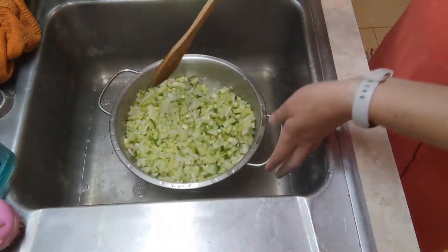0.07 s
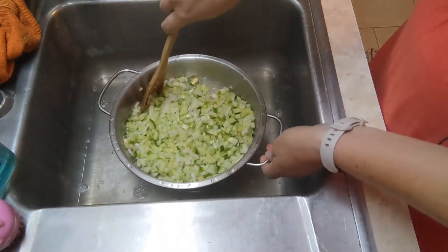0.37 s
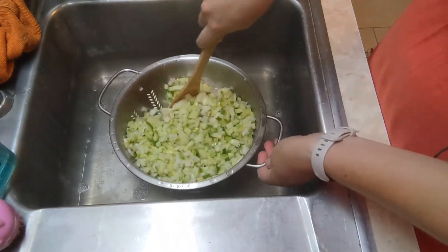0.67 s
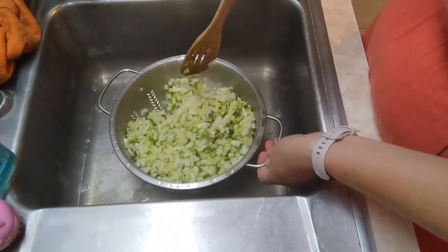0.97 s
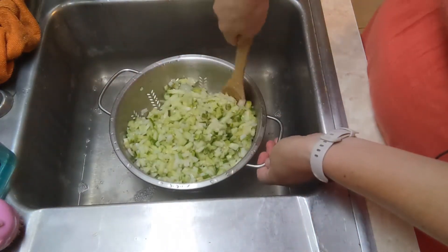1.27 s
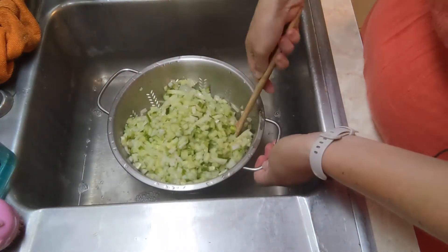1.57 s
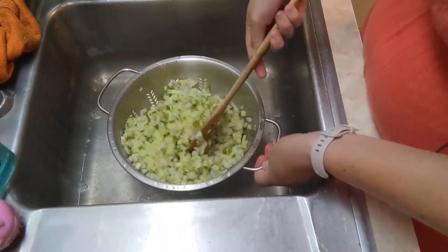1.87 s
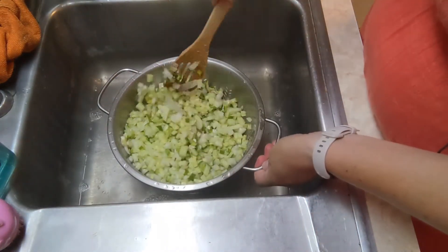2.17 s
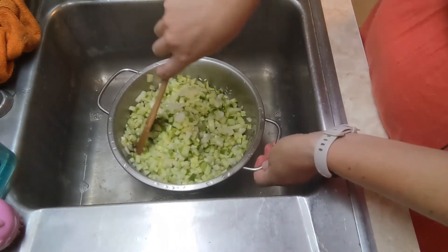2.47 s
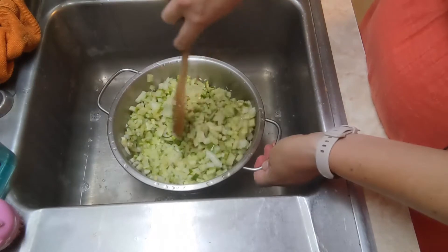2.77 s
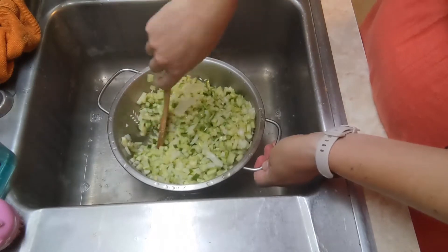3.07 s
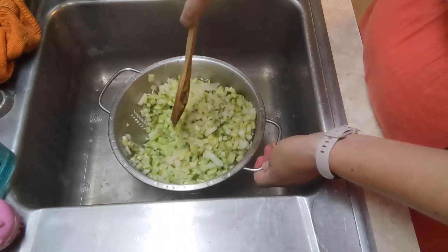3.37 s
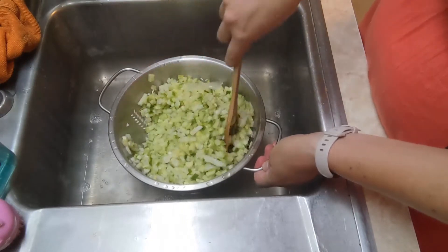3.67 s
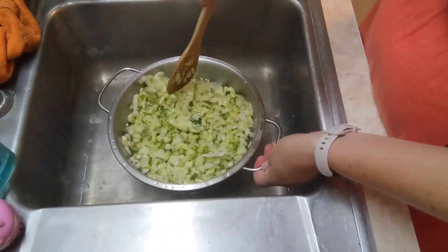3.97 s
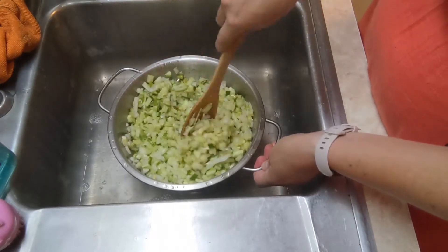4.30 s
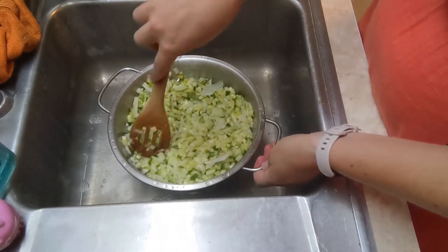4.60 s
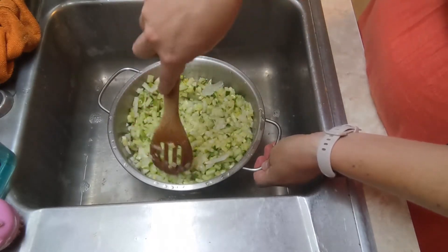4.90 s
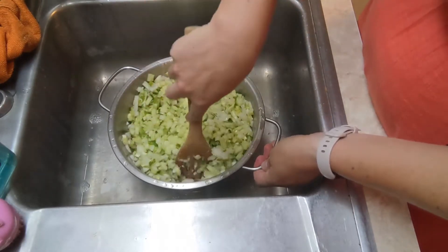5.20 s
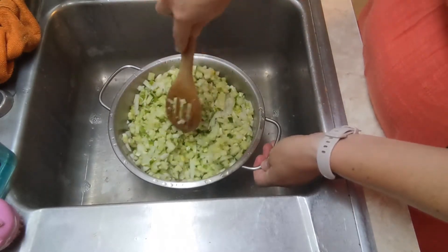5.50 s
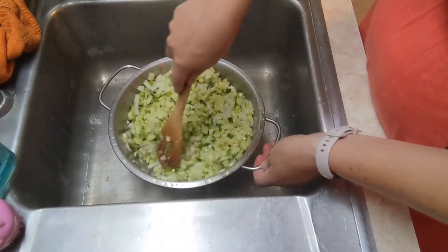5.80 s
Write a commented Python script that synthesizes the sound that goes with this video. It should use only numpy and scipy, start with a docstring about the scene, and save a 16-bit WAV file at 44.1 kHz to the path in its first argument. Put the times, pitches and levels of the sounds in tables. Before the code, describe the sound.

A wooden spoon stirs wet chopped vegetables in a steel colander set in a sink, heard close in a quiet kitchen. During the first second, soft bumps and a low rumble come from a hand on the microphone, and at 0.3 seconds the spoon lands with a light, ringing clack. Stirring picks up at 1 second, with sharp clacks and scrapes on the metal wall from 1.1 to 1.5 seconds. Strokes follow roughly every half second: dull knocks and thuds through the food, a tumbling rustle and tiny wet squelches, with colander and sink ringing briefly together. A clump flops over with a small plop at 2 seconds. A bright clack comes at 3.5 seconds, and a quick cluster with a rim clink at 4.3. After 5 seconds the stirring gets lighter, with faint taps, scrapes and one soft microphone bump, fading by about 6 seconds.

```python
"""Clacks, scrapes and dull knocks: a wooden spoon stirs wet chopped vegetables in a steel colander.
The spoon strikes the bare wall or pushes through the food to the floor of the steel sink below;
colander and sink ring together. The food tumbles, rustles and squelches as wet faces part.
Soft bumps and a low rumble come from the hand on the microphone, in a quiet kitchen."""
import sys
import numpy as np
from scipy import signal
from scipy.fft import rfft, irfft, next_fast_len
from scipy.io import wavfile
from scipy.ndimage import uniform_filter1d

SR = 44100
rng = np.random.default_rng(int(sys.argv[2]) if len(sys.argv) > 2 else 0)


def dump_mix(stems):
    """Bounce the given channels to the path in sys.argv[1] as a 16-bit WAV at rate SR."""
    frames = np.atleast_2d(stems).T  # one column per channel
    limited = np.clip(frames, -1, 1)  # hard clip at full scale
    pcm = np.round(limited * 32767).astype(np.int16)
    wavfile.write(sys.argv[1], SR, pcm)


N = 266760
TIME_S = np.arange(N) / SR
BLOW_S = TIME_S[:8192]

# Table levels are relative; each source adds its own trim.
# spoon on bare metal: start_s, level_db, spot_hz, spread_oct, body_db
WALL_CLACKS = [(0.2891, -51.5, 2420, 2.7, -49.5), (0.3233, -43.5, 7900, 0.18, -57.5),
               (0.361, -58, 3950, 0.23, -80), (0.524, -65, 7000, 0.49, -88),
               (0.596, -61.5, 11000, 0.39, -92), (0.641, -61.5, 3050, 0.29, -69),
               (1.1395, -36, 2750, 0.87, -44), (1.2121, -48, 12000, 0.86, -69),
               (1.2718, -45, 7600, 2.1, -66), (1.2823, -43, 3400, 1.16, -61.5),
               (1.501, -40, 5660, 0.42, -65), (1.503, -49.5, 9500, 0.48, -56.5),
               (3.488, -42.5, 8000, 2.4, -74), (3.4911, -43, 2220, 0.45, -74),
               (4.129, -50, 9300, 0.26, -65), (4.3429, -42, 4270, 0.58, -76),
               (4.351, -42.5, 3470, 0.54, -72), (4.374, -49, 3000, 0.56, -65.5),
               (4.839, -56.5, 8900, 0.41, -86), (5.1245, -59, 1960, 0.27, -55.5),
               (5.149, -59.5, 7500, 0.57, -74), (5.502, -60.5, 2780, 1.1, -66.5)]
# firm pushes through the food: start_s, knock_db, thud_db
FOOD_KNOCKS = [(0.999, -54.5, -49.5), (1.142, -50, -57), (1.312, -49.5, -48), (1.603, -67, -52),
               (1.679, -57.5, -63), (1.856, -57, -57), (1.962, -46, -46), (1.996, -50, -74),
               (2.243, -53.5, -42), (2.477, -52, -46), (2.611, -51.5, -43.5), (2.789, -45, -50),
               (2.875, -51.5, -68), (2.915, -56.5, -45), (2.943, -51.5, -50), (3.04, -61, -58),
               (3.204, -59.5, -48.5), (3.4439, -49, -47), (3.688, -52, -70), (3.841, -56.5, -53),
               (3.918, -52.5, -49.5), (4.1607, -59, -58), (4.272, -56.5, -56), (4.373, -51, -47),
               (4.4196, -50, -47), (4.517, -55, -51), (4.735, -54, -52.5), (4.776, -62, -50.5),
               (4.879, -54.5, -59), (4.966, -55, -71), (5.6459, -57.5, -75)]
# strokes through the food: start_s, length_s, effort_db, wet_db
SPOON_STROKES = [(0.474, 0.25, -13, -75.5), (0.947, 0.11, -0.5, -79), (1.26, 0.32, 4, -73),
                 (1.842, 0.31, 2.5, -73.5), (2.384, 0.37, -1.5, -75), (2.967, 0.46, -0.5, -73.5),
                 (3.662, 0.33, 0, -74.5), (4.182, 0.33, -1.5, -74.5), (4.712, 0.23, -1, -74),
                 (5.101, 0.092, 0.5, -70), (5.604, 0.22, -9, -77)]
# juice pockets parting: pitch_hz, scatter_oct, rate_per_s, level_db
JUICE_POCKETS = [(8850, 0.08, 38, -3), (4350, 0.3, 6, -5)]
# wood and food on the perforated wall: middle_s, width_s, hiss_db, rasp_db
WALL_SLIDES = [(0.337, 0.028, -60.5, -58), (0.463, 0.16, -65, -68), (1.207, 0.04, -50.5, -51),
               (1.282, 0.032, -55.5, -49.5), (1.344, 0.018, -65, -47), (2.062, 0.042, -69.5, -50.5),
               (2.43, 0.014, -67.5, -60.5), (2.497, 0.028, -69.5, -64.5), (3.07, 0.07, -74, -73),
               (4.191, 0.029, -64, -55.5), (5.149, 0.057, -65.5, -69), (5.808, 0.056, -71, -84)]
# a clump flops over: start_s, level_db, pitch_hz
CLUMP_PLOPS = [(2.042, -45, 750)]
# spoon catches the rim: start_s, level_db
RIM_CLINKS = [(1.1405, -56), (3.4895, -55), (4.3455, -43.5), (5.503, -65)]
# bumps on the microphone case: start_s, bump_db, boom_db, lowpass_hz
CASE_BUMPS = [(0.077, -42.5, -29, 600), (0.4742, -37, -40, 1510), (0.548, -40.5, -41.5, 850),
              (0.641, -50, -38.5, 300), (0.84, -46.5, -39, 346), (0.944, -51.5, -50, 414),
              (5.684, -48, -77, 1010)]
# hand sways: middle_s, width_s, sway_db, rumble_db
HAND_SWAYS = [(0.11, 0.29, -32, -30.5), (0.702, 0.054, -38, -33.5), (1.196, 0.48, -31, -45.5),
              (5.203, 0.078, -46.5, -49)]

# modes: pitch_hz, gain_db, t60_s
STEEL_RING = [(191.6, 4.5, 0.1), (475.5, 12, 0.38), (671.3, 11.5, 0.14), (843, 8.5, 0.14),
              (944, -0.5, 0.22), (1135, 13.5, 0.18), (1230, -0.5, 0.1), (1331, 0.5, 0.1), (1455, 0, 0.19),
              (1724, 8.5, 0.17), (1826, 8.5, 0.19), (2019, 5.5, 0.1), (2710, 1.5, 0.067), (3140, 0.5, 0.09),
              (4100, 4, 0.081)]  # colander and sink together
RIM_RING = [(1746, -10, 0.14), (2400, -5.5, 0.13), (3050, 4, 0.13), (3050, -36, 0.038), (3300, -17, 0.1),
            (3950, 1, 0.033), (4860, -0.5, 0.027), (5640, -32, 0.063), (6600, -18, 0.056)]
LANDING_RING = [(202.4, 5.5, 0.26), (417, 1, 0.15), (1006, -10, 0.15), (1184, -18, 0.6), (1215, -2, 0.13),
                (2066, -0.5, 0.082), (2143, -2.5, 0.12)]  # bowl's lowest note, spoon's bending modes

# spectra: freq_hz, gain_db
WOOD_ROLLOFF = [(9600, -0.5), (11200, -7), (15500, -30)]  # wood is too soft to excite the very top
KNOCK_SPECTRUM = [(150, -2.5), (400, -8.5), (750, 1), (1200, 9), (1530, 8.5), (1800, -12), (3000, -28),
                  (12000, -61.5)]
THUD_SPECTRUM = [(50, -27.5), (110, -9), (150, 1.5), (200, -6.5), (300, -14.5), (600, -19.5), (12000, -100)]
SQUEEZE_SPECTRUM = [(2500, -12), (4500, 11), (7000, -2), (9200, 7), (10500, -23), (15500, -25)]
TUMBLE_SPECTRUM = [(60, -16), (130, 5.5), (190, 4.5), (290, -11), (560, -11), (800, -8.5), (1200, -6.5),
                   (1520, -9.5), (1750, -26.5), (3000, -21.5), (12000, -51.5)]
FIZZ_SPECTRUM = [(1200, -22.5), (2200, 2.5), (3200, -6.5), (5500, -5.5), (7500, -9.5), (9200, -6.5),
                 (10500, -67), (12000, -12), (15500, -50)]
HISS_SPECTRUM = [(2500, -2.5), (4500, 2), (6000, 5), (9300, 7), (10500, -2.5), (12000, -8), (15500, -32)]
RASP_SPECTRUM = [(120, 16), (300, 3), (600, -2), (1800, 0), (2600, 3), (4100, -10), (5500, 0.5),
                 (11000, -51)]
BUMP_SPECTRUM = [(50, -30.5), (110, 12), (350, 2.5), (560, -0.5), (800, -2), (1300, -18.5), (4000, -29),
                 (12000, -73)]
SWAY_SPECTRUM = [(2.5, -6), (5, 3), (12, -15), (25, -43.5), (60, -92)]
RUMBLE_SPECTRUM = [(6, 7), (14, 12.5), (25, -3), (50, -13.5), (90, -25.5), (250, -51), (600, -70.5)]
AIR_SPECTRUM = [(35, -20.5), (60, 3), (98, -5.5), (351, -17.5), (1020, -24), (1150, -19), (1590, -25.5),
                (3340, -34.5), (8870, -40), (15500, -48.5)]


def clacks(t60_s=0.07, treble_damping=0.15, body_top_hz=1800, spot_db=6, spot_t60_s=0.0024, trim_db=-4):
    """Hard blows, strongest near the struck spot's pitch, over the bowl's low body. Highs die first."""
    out = np.zeros(N)
    edges_hz = [150, 600, body_top_hz, 5000, 7400, 10000, 15000]
    for start_s, level_db, spot_hz, spread_oct, body_db in WALL_CLACKS:
        spot_gain = from_db(spot_db) * np.exp(-spread_oct ** 2)
        for low_hz, high_hz in zip(edges_hz, edges_hz[1:]):
            offset_oct = np.log2(np.sqrt(low_hz * high_hz) / spot_hz)
            band_gain = from_db(level_db) * np.exp(-.5 * (offset_oct / spread_oct) ** 2)
            body_gain = from_db(body_db) * (high_hz <= body_top_hz)
            contact = burst(t60_s * (body_top_hz / low_hz) ** treble_damping, snap=7)
            contact += spot_gain * resonate(contact, spot_hz, spot_t60_s)
            bandpass = signal.butter(3, [low_hz, high_hz], "band", fs=SR, output="sos")
            band = at_level(signal.sosfilt(bandpass, contact), trim_db)
            add(out, start_s, np.hypot(band_gain, body_gain) * band)
    return colour(out, WOOD_ROLLOFF)


def knocks(effort, rise_s=0.002, give=1.4, spot_spread_db=4):
    """Cushioned blows, each coloured by its spot; the sink floor thuds and juice squeezes out."""
    out = np.zeros(N)
    for start_s, knock_db, thud_db in FOOD_KNOCKS + nudges(effort):
        spot_colour = np.outer(rng.standard_normal(len(KNOCK_SPECTRUM)), [0, spot_spread_db])
        knock = colour(push(0.034, rise_s, give), np.array(KNOCK_SPECTRUM) + spot_colour)
        thud = colour(push(0.08, rise_s, give), THUD_SPECTRUM)
        squeeze = colour(burst(t60_s=0.056), SQUEEZE_SPECTRUM)
        add(out, start_s, at_level(knock, knock_db - 2))
        add(out, start_s, at_level(thud, thud_db - 5))
        add(out, start_s, at_level(squeeze, knock_db - 21))
    return out


def nudges(effort, rate_per_s=14, spread_db=2, knock_db=-59, thud_db=-60):
    """Light knocks at loose intervals, scaled by the effort; rows as in FOOD_KNOCKS."""
    jitter = rng.standard_normal((120, 3))
    starts_s = (np.arange(len(jitter)) + .5 * jitter[:, 0]) / rate_per_s
    effort_db = 20 * np.log10(np.interp(starts_s, TIME_S, effort))
    levels_db = effort_db[:, None] + spread_db * jitter[:, 1:] + [knock_db, thud_db]
    return [row for row in np.column_stack([starts_s, levels_db]) if 0 < row[0] < TIME_S[-1]]


def strokes(dig_s=0.027, settle_s=0.3):
    """Effort and wet-rustle gains: the spoon digs in, holds and lifts; the food settles."""
    effort, wet = np.full((2, N), 1e-6)
    for start_s, length_s, effort_db, wet_db in SPOON_STROKES:
        dig = np.clip((TIME_S - start_s) / dig_s, 0, 1)
        settle = np.exp(-np.maximum(TIME_S - start_s - length_s, 0) / settle_s)
        effort = np.maximum(effort, from_db(effort_db) * dig * settle)
        wet = np.maximum(wet, from_db(wet_db) * dig * settle)
    return effort, wet


def stirring(effort, wet, tumble_db=-66, fizz_db=-2, squelch_db=-4.5):
    """Pieces tumble against the bowl; wet faces part with a fizz and small high squelches."""
    tumble = grains(TUMBLE_SPECTRUM, rate_per_s=920, spread_db=2.5, clump_db=5, clumps_per_s=49)
    fizz = grains(FIZZ_SPECTRUM, rate_per_s=4000, spread_db=3, clump_db=4.5, clumps_per_s=30)
    rustle = from_db(fizz_db) * fizz + from_db(squelch_db) * squelches()
    return from_db(tumble_db) * effort * tumble + wet * rustle


def squelches(rise_s=0.005, pocket_t60_s=0.0014, spread_db=3):
    """Each pocket of juice parts with a short soft crackle at its own pitch."""
    out = np.zeros(N)
    for centre_hz, scatter_oct, rate_per_s, level_db in JUICE_POCKETS:
        jitter = np.clip(rng.standard_normal((400, 3)), -2, 2)
        for k, (late, detune, size) in enumerate(jitter):
            start_s = (k + late) / rate_per_s
            pitch_hz = centre_hz * 2 ** (scatter_oct * detune)
            if 0 < start_s < TIME_S[-1]:
                crackle = burst(t60_s=0.06) * np.minimum(BLOW_S / rise_s, 1)
                for _ in range(2):
                    crackle = resonate(crackle, pitch_hz, pocket_t60_s)
                add(out, start_s, from_db(level_db + spread_db * size) * crackle)
    return rms_one(out)


def slides():
    """Each slide swells and fades: wet food hisses on the steel, wood ticks over the holes."""
    hiss = grains(HISS_SPECTRUM, rate_per_s=4500, spread_db=2.3, clump_db=2.8, clumps_per_s=160)
    rasp = grains(RASP_SPECTRUM, rate_per_s=2600, spread_db=3, clump_db=6, clumps_per_s=88)
    out = np.zeros(N)
    for middle_s, width_s, hiss_db, rasp_db in WALL_SLIDES:
        out += swell(middle_s, width_s) * (from_db(hiss_db + 1) * hiss + from_db(rasp_db - 3) * rasp)
    return out


def plops():
    """A falling clump closes a pocket of air, which rings briefly."""
    out = np.zeros(N)
    for start_s, level_db, pitch_hz in CLUMP_PLOPS:
        pocket = resonate(burst(t60_s=0.035), pitch_hz, t60_s=0.012)
        add(out, start_s, at_level(pocket, level_db - 3.5))
    return out


def steel(contacts, trim_db=3, split=0.011, moves_per_s=7):
    """Contacts ring colander and sink. Each mode is a close pair; the spot touched picks which speaks."""
    out = np.zeros(N)
    for pitch_hz, gain_db, t60_s in STEEL_RING:
        spot_rad = np.pi * wander(moves_per_s)
        lower = resonate(contacts * np.cos(spot_rad), pitch_hz * (1 - split), t60_s)
        upper = resonate(contacts * np.sin(spot_rad), pitch_hz * (1 + split), t60_s)
        out += from_db(gain_db + trim_db) * (lower + upper)
    return out


def struck(strikes, modes):
    """Free ringing after clean strikes, given as start_s, level_db."""
    out, t = np.zeros(N), TIME_S[:SR]
    ring = sum(np.sin(2 * np.pi * hz * t) * from_db(db - 60 * t / t60_s) for hz, db, t60_s in modes)
    for start_s, level_db in strikes:
        add(out, start_s, from_db(level_db) * ring)
    return out


def hand_rumble(steady_sway_db=-52, steady_rumble_db=-55.5):
    """The hand sways the microphone; rumble reaches it through the case."""
    sway, rumble = from_db(steady_sway_db), from_db(steady_rumble_db)
    for middle_s, width_s, sway_db, rumble_db in HAND_SWAYS:
        movement = swell(middle_s, width_s)
        sway = sway + from_db(sway_db) * movement
        rumble = rumble + from_db(rumble_db) * movement
    return sway * noise(SWAY_SPECTRUM) + rumble * noise(RUMBLE_SPECTRUM)


def case_bumps(case_hz=540, case_t60_s=0.047, boom_hz=48, boom_t60_s=0.11):
    """Soft bumps ring the microphone's case briefly, over a low boom."""
    out = np.zeros(N)
    boom = np.sin(2 * np.pi * boom_hz * BLOW_S) * BLOW_S * from_db(-60 * BLOW_S / boom_t60_s)
    for start_s, bump_db, boom_db, lowpass_hz in CASE_BUMPS:
        bump = colour(push(t60_s=0.82, rise_s=0.003025), BUMP_SPECTRUM)
        bump = signal.sosfilt(signal.butter(2, lowpass_hz, fs=SR, output="sos"), bump)
        add(out, start_s, at_level(bump + resonate(bump, case_hz, case_t60_s), bump_db - 3))
        add(out, start_s, at_level(boom, boom_db - 2))
    return out


def kitchen(x, t60_s=0.45, delay_s=0.0057):
    """A dense tail from the hard walls, duller than the direct sound."""
    t = TIME_S[:SR]
    tail = rng.standard_normal(SR) * from_db(-60 * t / t60_s) * (t > delay_s)
    tail = colour(tail / np.linalg.norm(tail), [(150, 2.5), (1000, 3.05), (5000, 1.06), (12000, 0.29)])
    return signal.fftconvolve(x, tail)[:N]


def burst(t60_s, snap=0):
    """A contact: a first click of size snap, then dying micro-impacts."""
    x = rng.standard_normal(len(BLOW_S)) * from_db(-60 * BLOW_S / t60_s)
    x[0] += snap
    return x


def push(t60_s, rise_s, give=0, slips=30):
    """A cushioned contact: a first break scaled by give, then a quick run of small slips."""
    x = np.zeros(len(BLOW_S))
    slip_s = rng.gamma(2, rise_s, slips)
    np.add.at(x, np.minimum(slip_s * SR, len(x) - 1).astype(int), rng.standard_normal(slips))
    x[0] += give * np.sqrt(slips)
    return x + burst(t60_s) * np.sqrt(slips / (t60_s * SR))


def grains(spectrum, rate_per_s, spread_db, clump_db, clumps_per_s):
    """Tiny uneven contacts that come in clumps; coloured, rms 1."""
    sizes = from_db(spread_db * np.minimum(rng.exponential(1, N), 5)) * rng.choice([-1, 1], N)
    clumps = from_db(clump_db * np.clip(wander(clumps_per_s), -2, 2))
    hits = rng.random(N) < rate_per_s / SR
    return rms_one(colour(sizes * hits * clumps, spectrum))


def noise(spectrum):
    """Coloured noise, rms 1."""
    return rms_one(colour(rng.standard_normal(N), spectrum))


def wander(rate_per_s):
    """Random drift."""
    return np.interp(TIME_S * rate_per_s, np.arange(N), rng.standard_normal(N))


def swell(middle_s, width_s):
    """Gaussian rise and fall."""
    return np.exp(-2 * np.minimum(((TIME_S - middle_s) / width_s) ** 2, 20))


def colour(x, spectrum):
    """Minimum-phase filter that follows a spectrum."""
    size = 2 * next_fast_len(len(x) // 2 + 4096)
    freq_hz, gain_db = np.transpose(spectrum)
    grid_hz = np.maximum(np.arange(size // 2 + 1) * SR / size, 1)
    gain = from_db(np.interp(np.log(grid_hz), np.log(freq_hz), gain_db))
    cepstrum = irfft(np.log(gain))
    cepstrum[1:size // 2] *= 2
    response = np.exp(rfft(cepstrum[:size // 2 + 1], size))
    return irfft(rfft(x, size) * response)[:len(x)]


def resonate(x, pitch_hz, t60_s):
    """One resonance, peak gain 1."""
    radius = from_db(-60 / (t60_s * SR))
    feedback = [1, -2 * radius * np.cos(2 * np.pi * pitch_hz / SR), radius ** 2]
    return signal.lfilter(np.array([1, 0, -1]) * (1 - radius ** 2) / 2, feedback, x + 1e-18)


def at_level(x, level_db):
    """Set the rms of the loudest 5 ms."""
    return x * from_db(level_db) / np.sqrt(uniform_filter1d(x * x, SR // 200).max())


def rms_one(x):
    """Scale to rms 1."""
    return x / np.sqrt(np.mean(x ** 2) + 1e-20)


def from_db(db):
    """Decibels to gain."""
    return 10 ** (np.asarray(db) / 20)


def add(out, start_s, sound):
    """Mix a sound in at start_s."""
    at = max(round(start_s * SR), 0)
    out[at:at + len(sound)] += sound[:N - at]


def scene(landing_s=0.288, landing_db=-44, room_db=-8, rim_send_db=-5.5, air_db=-66.5):
    """Contacts in the bowl, its ring, the room, still air and the hand on the microphone; mono."""
    air = from_db(air_db) * noise(AIR_SPECTRUM)
    hand = hand_rumble() + case_bumps()
    effort, wet = strokes()
    contacts = clacks() + plops() + slides() + knocks(effort) + stirring(effort, wet)
    rim = struck(RIM_CLINKS, RIM_RING)
    landing = struck([(landing_s, landing_db)], LANDING_RING)  # loosely held spoon first lands
    bowl = contacts + steel(contacts) + rim + landing
    room = from_db(room_db) * kitchen(contacts + from_db(rim_send_db) * rim)
    return (bowl + room + air + hand)[None]


def record(dry):
    """Steep low-pass at 15750 Hz."""
    return signal.sosfilt(signal.ellip(10, .1, 80, 15750, fs=SR, output="sos"), dry)


dry = scene()
out = record(dry)
dump_mix(out)
```